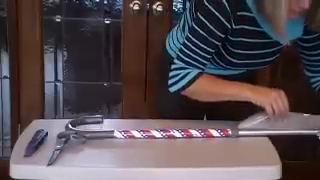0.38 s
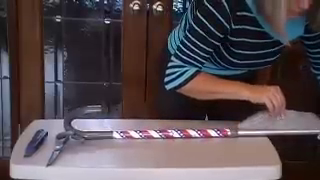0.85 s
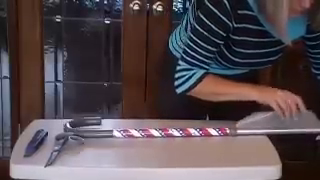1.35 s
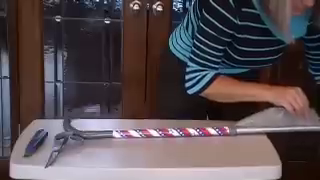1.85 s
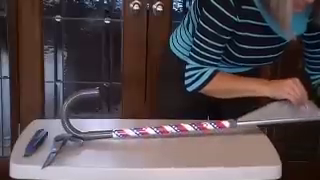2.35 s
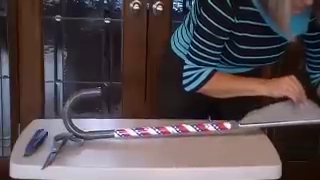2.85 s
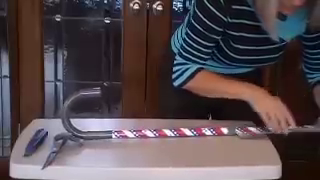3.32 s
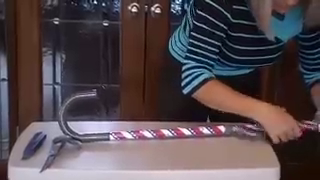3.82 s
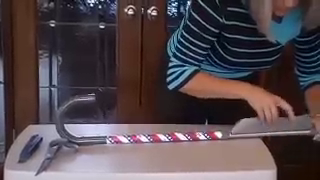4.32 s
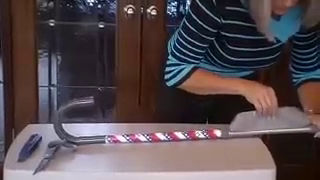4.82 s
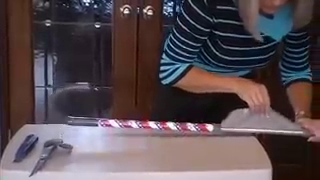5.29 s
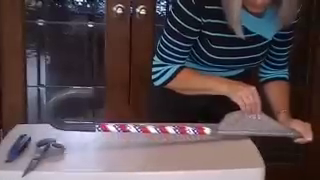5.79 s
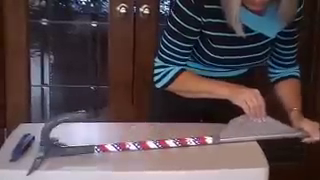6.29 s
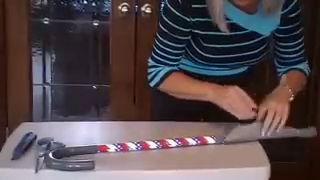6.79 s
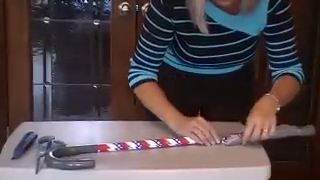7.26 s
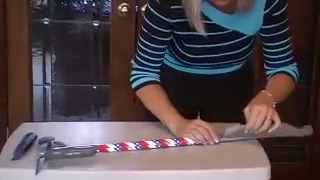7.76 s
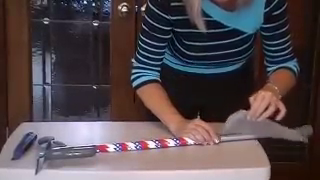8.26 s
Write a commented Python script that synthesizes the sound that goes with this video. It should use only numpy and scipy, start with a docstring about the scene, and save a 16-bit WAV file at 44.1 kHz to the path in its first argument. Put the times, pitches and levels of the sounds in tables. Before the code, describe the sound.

Quiet handling and a brief rubbery creak, then two bursts of hollow table knocks with sharp film snaps, in a small hard room.

```python
"""Hollow cane on a folding table

A hollow metal cane knocks on a plastic table top: struck modes boom and rumble on under a noisy clatter.
A sticky sheet snaps, peels and squeaks: resonated clicks, coloured random grains and short tones.
A rubber grip creaks by stick-slip pulses, and the microphone's housing ticks.
Random taps make the hard-walled room; shaped noise and wavering tones make its air and appliance hum.
A small stereo microphone hears it all."""
import sys
import numpy as np
from scipy import signal
from scipy.fft import rfft, irfft, next_fast_len
from scipy.io import wavfile
from scipy.ndimage import uniform_filter1d

SR = 44100
rng = np.random.default_rng(int(sys.argv[2]) if len(sys.argv) > 2 else 0)


def invert_db(x):
    """Field ratio 10**(x/20) for x, a level in decibels (scalar or array-like)."""
    u = np.asarray(x, float) / 20
    return 10 ** u


def file_out(sig):
    """Save sig as 16-bit WAV at sys.argv[1]."""
    # one column per channel
    cols = np.atleast_2d(sig).T
    # limit, then scale
    lim = np.clip(cols, -1, 1)
    pcm = np.round(lim * 32767).astype(np.int16)
    wavfile.write(sys.argv[1], SR, pcm)


N = 369551
BOOM_TOP_HZ = 400  # table modes below this boom, those above belong to the plate


def evened(x):
    """Scales to rms 1."""
    return x / np.sqrt(np.mean(x ** 2) + 1e-20)


def peaked(x):
    """Scales to peak 1."""
    return x / (abs(x).max() + 1e-12)


def read(points, hz):
    """Reads a spectrum on a log-frequency axis."""
    point_hz, value = np.transpose(points)
    return np.interp(np.log(hz + 1), np.log(point_hz + 1), value)


def add(mix, start_s, sound):
    """Mixes a sound in at its start time."""
    part = mix[round(start_s * SR):][:len(sound)]
    part += sound[:len(part)]


def smooth_noise(length, span):
    """Slow random motion of rms 1: white noise averaged over a span of samples."""
    return evened(uniform_filter1d(rng.standard_normal(length), span))


def butter(x, order, hz, kind="low"):
    """Butterworth filter."""
    return signal.lfilter(*signal.butter(order, hz, kind, fs=SR), x)


def resonate(x, hz, width_hz):
    """A two-pole resonance of gain near 1."""
    r = np.exp(-np.pi * width_hz / SR)
    return signal.lfilter([1 - r, 0, r - 1], [1, -2 * r * np.cos(2 * np.pi * hz / SR), r * r], x)


def resonate_twice(x, hz, width_hz):
    """The same resonance in series with itself, for steeper skirts."""
    return resonate(resonate(x, hz, width_hz), hz, width_hz)


def coloured(x, points):
    """Shapes x by a dB spectrum."""
    size = next_fast_len(x.shape[-1])
    gain = invert_db(read(points, np.fft.rfftfreq(size, 1 / SR)))
    return irfft(rfft(x, size) * gain, size)[..., :x.shape[-1]]


def paired(shared, differing, likeness):
    """Two microphone ports hear partly the same field: one part is shared, the other has opposite signs."""
    size = next_fast_len(N)
    same = read(likeness, np.fft.rfftfreq(size, 1 / SR))
    mid = rfft(shared, size) * np.sqrt(1 + same)
    side = rfft(differing, size) * np.sqrt(1 - same)
    return irfft([mid + side, mid - side], size)[:, :N] / np.sqrt(2)


# Modes of the table top, low boards then upper plate: pitch_hz, relative level_db, t60_s
TABLE_MODES = [(124, 1.5, 0.1), (150.6, 6.5, 0.074), (197, 7.5, 0.16), (240, 3.5, 0.24), (252, 7.5, 0.049),
               (271.3, 23.5, 0.029), (304, 18.5, 0.053), (395, -1, 0.13), (473.4, 5, 0.069),
               (599.4, -10, 0.21), (611, -8, 0.19), (656, 1, 0.062), (690, 8, 0.03), (881, 4.5, 0.035),
               (1110, -50, 0.0086), (1130, -10, 0.011), (1420, -46, 0.031), (1448, -1, 0.049),
               (1556, 9.5, 0.013), (2030, 14, 0.011), (2255, 10.5, 0.0091), (2870, -44, 0.02),
               (2860, 7, 0.0053), (3255, -16, 0.016)]


def knock(clatter_db, boom_db, place_hz, hardness):
    """A blow rings the table top, and the cane chatters on it in a dense rattle."""
    t = np.arange(SR // 4) / SR
    hz, db, t60 = np.transpose(TABLE_MODES)[:, :, None]
    sign = (-1) ** np.arange(len(TABLE_MODES))[:, None]  # neighbouring modes move in turn
    rings = invert_db(db - 60 * t / t60) * np.sin(2 * np.pi * hz * t)
    low = hz[:, 0] < BOOM_TOP_HZ

    near = 1 / (1 + (np.log(hz[low] / place_hz) / 0.29) ** 2) ** 2  # boards near the blow move most
    boom = (rings[low] * near).sum(0) * (1 - np.exp(-t / 0.0038)) ** 2

    # 14 ms decay at -20 dB; a lighter touch skids and chatters longer
    chatter_s = 0.014 * 1.09 ** (-clatter_db / 10 - 2)
    rattle = rng.standard_normal(len(t)) * invert_db(2.19 * rng.exponential(1, len(t)))
    rattle *= np.exp(-t / chatter_s)
    plate = 0.2 * (sign * rings)[~low].sum(0) + 0.96 * rattle
    plate[0] += 12  # the crack of contact
    edge_hz = 650 * 16 ** hardness  # a harder contact is shorter and brighter
    plate = butter(plate, 3, edge_hz) + 0.021 * plate  # a little grit stays
    plate = butter(plate, 2, 300, "high")
    return invert_db(boom_db) * peaked(boom) + invert_db(clatter_db) * peaked(plate)


# Cane on table: start_s, clatter_db and boom_db (peaks before the table's band limit),
# place_hz (where the top booms), contact hardness (0-1)
CANE_KNOCKS = [(1.113, -38, -40, 298, .41), (1.158, -44.5, -45, 318, 0.3), (1.248, -34.5, -38.5, 323, 0.69),
               (1.351, -14, -11, 210, 0.46), (1.37, -26.5, -29, 190, 0.8), (1.397, -15, -13.5, 214, 0.46),
               (1.449, -35.5, -21.5, 240, 0.83), (1.638, -42.5, -63, 293, 0.34),
               (1.977, -39, -59, 116, .45), (2.049, -41.5, -37, 139, .25), (2.148, -46, -44.5, 212, 0.2),
               (2.564, -39, -47, 124, 0.32), (3.06, -27.5, -67, 398, 1), (3.314, -48, -66, 127, 0.3),
               (4.164, -43.5, -53, 366, 0.47), (4.355, -47, -60, 116, 0.7), (5.026, -38, -42, 345, 0.38),
               (5.043, -40.5, -44, 293, 0.37), (5.242, -45.5, -53, 363, 0.13),
               (5.521, -51, -39.5, 250, 0.38), (6.161, -19, -22, 290, 0.4), (6.168, -31, -19.5, 304, 0.69),
               (6.178, -44, -27, 130, 0.26), (6.206, -23, -22, 296, 0.27), (6.235, -33, -28.5, 192, 0.23),
               (6.357, -41, -34.5, 315, 0.24), (6.43, -42, -41.5, 200, 0.31),
               (6.565, -34.5, -49, 298, 0.43), (6.634, -35.5, -45, 299, 0.28),
               (6.673, -26.5, -25, 327, 0.33), (6.695, -11.5, -15, 287, 0.21),
               (6.701, -6.5, -38, 394, 0.52), (6.706, -12.5, -14.5, 129, 0.31), (6.718, -8.5, -37, 300, .3),
               (6.754, -17.5, -20.5, 141, 0.17), (6.789, -21.5, -17, 277, 0.54),
               (6.825, -25, -23.5, 166, 0.37), (7.089, -42.5, -45, 237, 0.28),
               (7.441, -39.5, -51, 116, .45), (7.551, -43, -41, 324, 0.27)]


def knocks():
    """The cane's blows on the table, laid out in time."""
    out = np.zeros(N)
    for start_s, *blow in CANE_KNOCKS:
        add(out, start_s, knock(*blow))
    return out


# Hands and cane sliding over the top: start_s, rms level_db
SLIDE_LEVEL = [(0, -58.5), (.86, -63), (1.07, -55.5), (1.87, -59.5), (2.2, -62), (3.34, -61.5), (3.87, -68),
               (4.6, -54.5), (4.81, -65.5), (5.48, -59), (5.75, -69.5), (6.3, -58.5), (6.55, -49),
               (7.05, -60), (7.9, -59.5), (8.38, -64.5)]


def slide():
    """Soft friction rumbles in the table's low boards, which also rumble on after each blow."""
    drive = rng.standard_normal(N) * invert_db(1.5 * smooth_noise(N, 1500))
    rumble = sum(resonate_twice(drive, hz, 78) for hz, _, _ in TABLE_MODES if hz < BOOM_TOP_HZ)
    rumble_db, rumble_rise_s, rumble_t60_s = -23, 0.032, 0.63  # level is relative to the blow's boom
    ringing_power, t = np.zeros(N), np.arange(SR) / SR
    for start_s, _, boom_db, _, _ in CANE_KNOCKS:
        ringing = invert_db(boom_db + rumble_db - 60 * t / rumble_t60_s) * (1 - np.exp(-t / rumble_rise_s))
        add(ringing_power, start_s, ringing ** 2)
    sliding = invert_db(np.interp(np.arange(N) / SR, *np.transpose(SLIDE_LEVEL)))
    return np.sqrt(sliding ** 2 + ringing_power) * evened(rumble)


def snap(bright_db, body_db):
    """A short tick: a bright, briefly ringing part over a duller body."""
    click = signal.unit_impulse(512)
    click += 0.2 * rng.standard_normal(512) * np.exp(-np.arange(512) / SR / 0.0012)
    bright_hz = 8050 * (1 + 0.02 * rng.standard_normal())
    dryness = 0.22  # 0 rings like metal, 1 is dry like film
    bright = resonate_twice(click, bright_hz, 900 * 6 ** dryness)
    body = resonate(resonate(click, 2600, 3300), 2500, 3200)
    body += 1.13 * resonate(click, 5600, 2400) + 0.12 * resonate(click, 7600, 3000)
    tick = invert_db(bright_db) * peaked(bright) + invert_db(body_db) * peaked(body)
    return butter(tick, 3, 11000)  # little extreme treble


# Snaps of the sticky sheet and ticks of the tube: start_s, bright_db, body_db (peaks before the treble cut)
SHEET_SNAPS = [(.069, -57, -48), (0.1455, -48, -70.5), (0.391, -52, -68), (1.1134, -52, -61),
               (1.144, -44, -58), (1.2477, -43, -60), (1.273, -45, -49), (1.2854, -36, -25.5),
               (1.3493, -35, -50), (1.368, -34.5, -48), (1.3874, -31, -42), (1.4005, -23, -39),
               (1.4315, -45, -48), (1.764, -44.5, -40), (1.978, -51, -64), (2.1516, -56, -47),
               (2.313, -53, -65), (3.047, -44, -39), (3.062, -27, -26), (3.2231, -57, -66),
               (3.3117, -49, -64), (3.5588, -71, -45), (3.835, -55, -68), (4.1456, -61, -43),
               (4.1653, -63, -29.5), (4.178, -40, -55), (4.3592, -64, -28.5), (5.1736, -59, -52),
               (5.474, -45, -59), (5.5292, -44, -32), (5.5583, -46, -60), (5.7697, -48, -38),
               (6.1611, -33, -17.5), (6.2088, -32, -56), (6.4322, -51.5, -47), (6.4757, -46, -58),
               (6.563, -28.5, -40), (6.5665, -40, -44), (6.6283, -44, -36), (6.675, -31, -52),
               (6.6813, -30, -46), (6.691, -29, -24), (6.703, -45, -9.5), (6.7071, -20, -24),
               (6.721, -22, -24.5), (6.7382, -25.5, -16), (6.7827, -27, -37.5), (6.789, -21.5, -31),
               (6.8133, -32.5, -40), (7.055, -56, -47), (7.212, -63, -54), (7.439, -58, -37),
               (7.7003, -54, -45)]


def snaps():
    """Snaps and ticks, laid out in time."""
    out = np.zeros(N)
    for start_s, *tick in SHEET_SNAPS:
        add(out, start_s, snap(*tick))
    return out


# Peeling and rustling: start_s, rms level_db at airiness 0, airiness (0-1)
PEEL_LEVEL = [(0, -71, 0), (.55, -70, .2), (.8, -60, .3), (.95, -73, 0), (1.3, -60, 0.26), (1.4, -72, 0.4),
              (1.9, -71, 0), (2.05, -61, 0), (2.25, -76, 0), (2.55, -76, .6), (2.83, -58.5, 0.75),
              (2.88, -62, .66), (2.91, -78, .7), (3.5, -83, 0), (4.7, -69.5, 0.6), (5.15, -69, 0.6),
              (5.9, -76, 0), (6.4, -66, 0.3), (6.7, -58, 0.15), (6.9, -64.5, 0), (7.66, -68.5, 0.35),
              (7.77, -59.5, 0.67), (7.92, -64.5, 0.66), (8.149, -62.5, 0.7), (8.3, -54.5, 0.63)]
# Spectrum of the sheet: pitch_hz, relative level_db (per Hz)
SHEET_COLOUR = [(880, -42), (1500, 5.5), (2300, -1.5), (2590, 0.5), (4420, -5), (6370, -5.5), (8240, -6.5),
                (13800, -52), (16000, -61)]
# Spectrum of the thin film edge: pitch_hz, relative level_db (per Hz)
FILM_COLOUR = [(3000, -23), (6000, -5), (9000, -3.5), (12000, -10), (14500, -22), (16000, -22)]


def peel():
    """Dense tiny releases of glue, a few larger, in clumps."""
    clump = invert_db(1.5 * smooth_noise(N, 900))
    size = rng.standard_normal(N) * invert_db(1.2 * rng.exponential(1, N))
    grains = clump * size * (rng.random(N) < 8000 / SR)  # about 8000 grains a second
    start_s, db, airiness = np.transpose(PEEL_LEVEL)
    t = np.arange(N) / SR
    level, airy = invert_db(np.interp(t, start_s, db)), np.interp(t, start_s, airiness)
    sheet = evened(coloured(grains, SHEET_COLOUR))
    film = invert_db(-3) * evened(coloured(grains, FILM_COLOUR))
    return level * ((1 - airy) * sheet + airy * film)


# Resonances of grip and tube: pitch_hz, width_hz (of each of two passes), relative level_db
GRIP_MODES = [(800, 170, 11), (1260, 440, 13.5), (2050, 460, 14.5), (3500, 260, 7), (5010, 820, -0.5),
              (5780, 280, 4.5), (7750, 1500, 2.5)]


def grip(drive):
    """The resonances of grip and tube."""
    return sum(invert_db(db) * resonate_twice(drive, hz, width_hz) for hz, width_hz, db in GRIP_MODES)


# Fast creak of the rolling rubber grip: start_s, slip rate_hz before wobble, rms level_db
CREAK_PATH = [(.476, 150, -58), (.53, 161, -61), (0.571, 137, -45), (.6, 200, -46.5), (0.629, 230, -61),
              (.66, 215, -67), (0.759, 150, -63.5), (0.861, 155, -61), (.95, 130, -69)]
# Single slips of the grip: start_s, peak level_db
SINGLE_SLIPS = [(0.4776, -41.5), (0.501, -38), (0.5293, -37), (0.5437, -34.5), (0.5584, -40), (0.5676, -33)]


def creak():
    """Uneven fast stick-slip pulses, and single slips, ring the grip and tube."""
    start_s, rate_hz, db = np.transpose(CREAK_PATH)
    t = np.arange(start_s[0], start_s[-1], 1 / SR)
    wobble = 1 + 0.25 * smooth_noise(len(t), 300)
    turns = np.cumsum(np.interp(t, start_s, rate_hz) * wobble) / SR
    pulses = np.diff(np.floor(turns), prepend=-1)  # one for each whole turn
    pulses *= invert_db(2.9 * rng.standard_normal(len(t)))
    drive = evened(pulses) + 0.9 * rng.standard_normal(len(t))
    out = np.zeros(N)
    add(out, start_s[0], invert_db(np.interp(t, start_s, db)) * evened(grip(drive)))
    for slip_s, slip_db in SINGLE_SLIPS:
        add(out, slip_s, invert_db(slip_db) * peaked(grip(signal.unit_impulse(1024))))
    return out


def squeak(length_s, level_db, low_hz, high_hz):
    """A skin of glue sings for a moment at two narrow resonances."""
    drive = rng.standard_normal(round(length_s * SR))
    tone = resonate(drive, low_hz, 70) + 0.79 * resonate(drive, high_hz, 90)
    return invert_db(level_db) * evened(tone) * signal.windows.tukey(len(drive), 0.4)


# Two-toned squeaks of the sheet on the tube: start_s, length_s, level_db (rms before the fades),
# low_hz, high_hz
SHEET_SQUEAKS = [(3.209, .035, -68, 1470, 2100), (3.31, 0.039, -63, 1640, 2230)]


def squeaks():
    """Brief squeaks, laid out in time."""
    out = np.zeros(N)
    for start_s, *note in SHEET_SQUEAKS:
        add(out, start_s, squeak(*note))
    return out


# Ticks of the microphone's housing: start_s, buzz peak level_db, top_hz, decay_s,
# thud_db (right port, before its decay)
HOUSING_TICKS = [(3.694, -41.5, 2730, 0.011, -63), (4.299, -38.5, 1200, 0.0065, -50),
                 (5.473, -28, 2570, 0.012, -36), (5.52, -34, 800, 0.0081, -36)]


def housing():
    """Short dry buzzes and a thud carried by the shell straight to each port."""
    out, t = np.zeros((2, N)), np.arange(4096) / SR
    for start_s, level_db, top_hz, decay_s, thud_db in HOUSING_TICKS:
        buzz = butter(rng.standard_normal((2, 4096)), 2, [350, top_hz], "band")
        buzz[1] -= 0.34 * buzz[0]  # the shell flexes: one port is pushed as the other is pulled
        thud = invert_db(thud_db) * np.sin(2 * np.pi * 120 * t) * np.exp(-t / 0.01)
        for port, push in enumerate((-0.7, 1)):
            tick = invert_db(level_db) * peaked(buzz[port] * np.exp(-t / decay_s))
            add(out[port], start_s, tick + push * thud)
    return out


# Decay of the room: pitch_hz, t60_s
ROOM_DECAY = [(125, 0.27), (500, 0.44), (1500, 0.38), (4000, 0.31), (10000, 0.16)]
# Colour of the reflections, weaker in the bass: pitch_hz, level_db
ROOM_COLOUR = [(150, -8), (300, -1.5), (450, -1)]
# Left-right likeness of the reflections: pitch_hz, likeness (0-1)
ROOM_LIKENESS = [(100, 1), (300, 0.96), (1400, 0.85), (5000, 0.93), (9000, 0.2), (14000, 0.22)]


def room(x):
    """Sparse taps of random sign, each band dying at its own speed, make reverberation tails."""
    taps = np.zeros((6, SR))
    at = np.arange(200, SR - 10, 10) + rng.integers(0, 10, (6, (SR - 201) // 10))  # one in every ten samples
    np.put_along_axis(taps, at, rng.choice([-1., 1.], at.shape), 1)
    hz, t, bands = signal.stft(taps, SR, nperseg=256)
    band_db = read(ROOM_COLOUR, hz)[:, None] - 60 * t / read(ROOM_DECAY, hz)[:, None]
    tail = signal.istft(bands * invert_db(band_db), SR, nperseg=256)[1]
    tail *= 1 - np.exp(-np.arange(tail.shape[1]) / SR / 0.0018)  # reflections build up
    tail /= np.linalg.norm(tail[0])

    # three pairs of random tails take turns, 9 rounds a second, to keep the reverberation smooth
    turn = 9 * np.arange(N) / SR + np.arange(3)[:, None] / 3
    share = np.sqrt(2 / 3) * np.cos(np.pi * turn)
    wet = signal.fftconvolve(np.tile(x * share, (2, 1)), tail, axes=1)[:, :N]
    return paired(*wet.reshape(2, 3, N).sum(1), ROOM_LIKENESS)


# Spectrum of the quiet air: pitch_hz, relative level_db (per Hz)
AIR_COLOUR = [(12, -42), (25, -25), (60, -13.5), (110, -11), (160, -8.5), (220, -4), (300, -11.5),
              (370, -6.5), (450, -17.5), (760, -12), (2670, -28.5), (5600, -32), (9000, -40), (12000, -46),
              (16000, -52)]
# Appliance hum: pitch_hz, waver_hz (rms), level_db (rms before the stereo spread)
HUM_TONES = [(120.6, 0.97, -58.5), (188, 0.56, -77), (370.5, 0.87, -58)]
# Left-right likeness of the background: pitch_hz, likeness (0-1)
AIR_LIKENESS = [(60, 0.13), (130, 0.33), (290, 0.25), (640, 0.037), (3100, 0.0091), (6800, 0.26),
                (15000, .02)]


def background():
    """Air and appliance noise that swells slightly, with a wavering hum."""
    swell = invert_db(1.62 * smooth_noise(N, 6000))
    air = invert_db(-54.5) * evened(coloured(rng.standard_normal((2, N)), AIR_COLOUR)) * swell
    for hz, waver_hz, db in HUM_TONES:
        drift = waver_hz * smooth_noise(N, 4000)
        turns = np.cumsum(hz + drift) / SR + rng.random()
        air[0] += invert_db(db) * np.sqrt(2) * np.sin(2 * np.pi * turns)
    return paired(*air, AIR_LIKENESS)


def scene():
    """Table and hands straight ahead, their room, the housing and the background."""
    table_band = signal.butter(6, [108, 11000], "band", fs=SR, output="sos")
    table = signal.sosfilt(table_band, slide() + knocks())  # no deep bass, no extreme treble
    hands = peel() + creak() + snaps() + squeaks()
    reflections = room(invert_db(-0.5) * table + invert_db(-3.5) * hands)
    return table + hands + reflections + housing() + background()


def roll_off(x):
    """The treble ends steeply here."""
    return signal.sosfilt(signal.butter(12, 16450, fs=SR, output="sos"), x)


# Lean of the two ports: pitch_hz, left over right level_db
PORT_LEAN = [(60, -4), (180, -2.5), (550, -1.5), (1650, 0.0), (4970, -1), (15000, -1)]


def record(dry):
    """The two microphone ports lean differently by frequency, then the extreme treble is cut."""
    ports = [coloured(x, [(hz, side * db / 2) for hz, db in PORT_LEAN]) for x, side in zip(dry, (1, -1))]
    mix = signal.oaconvolve(ports, signal.firwin(255, 15400, fs=SR)[None], "same")
    return roll_off(mix)


dry = scene()
out = record(dry)
file_out(out)
```